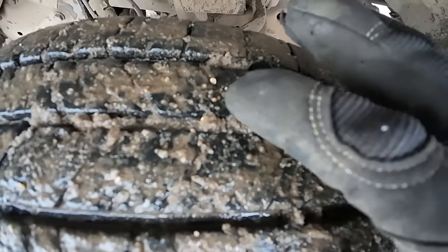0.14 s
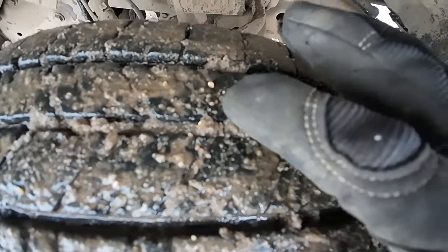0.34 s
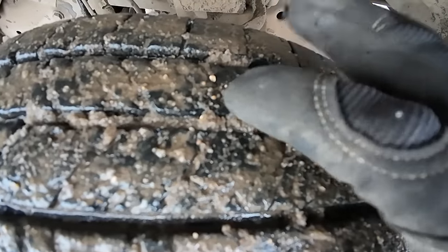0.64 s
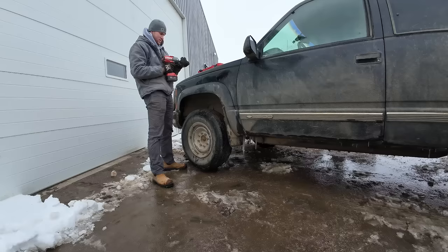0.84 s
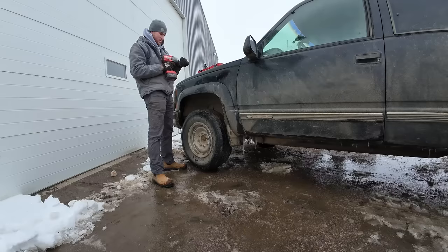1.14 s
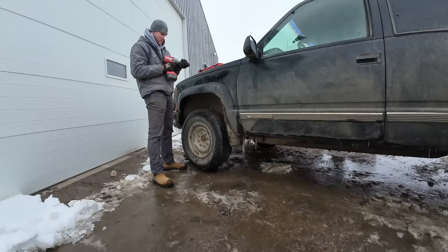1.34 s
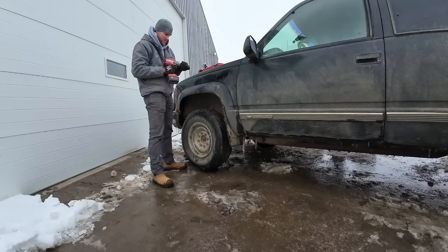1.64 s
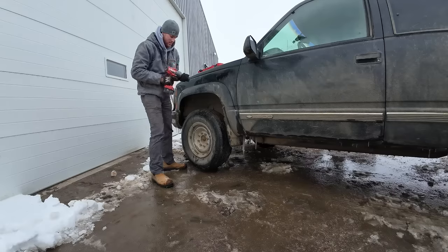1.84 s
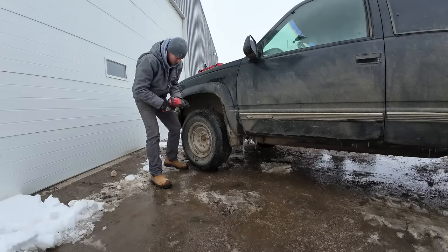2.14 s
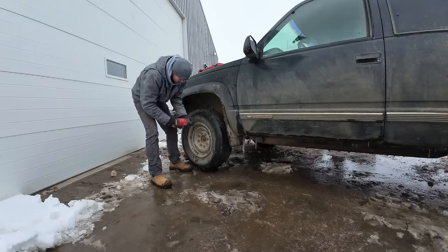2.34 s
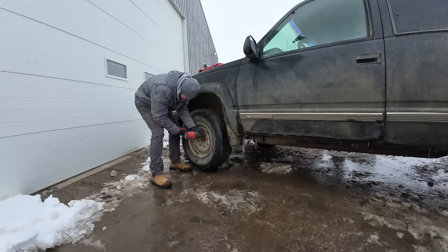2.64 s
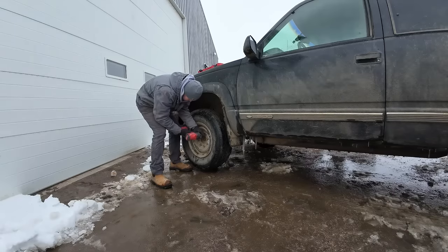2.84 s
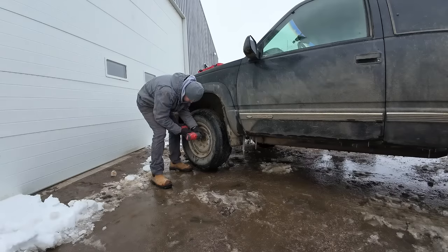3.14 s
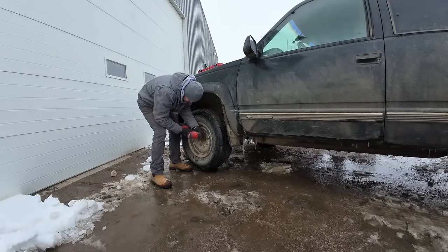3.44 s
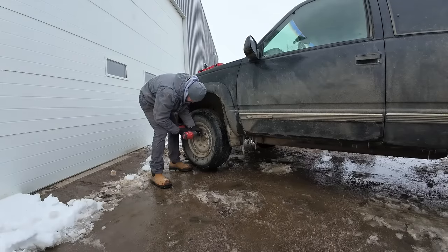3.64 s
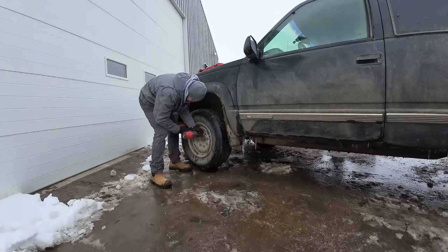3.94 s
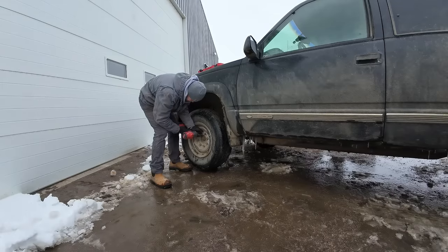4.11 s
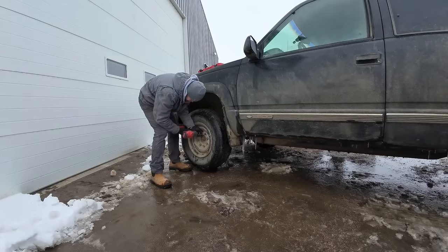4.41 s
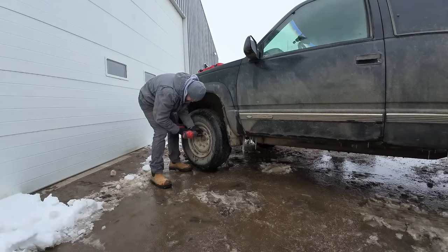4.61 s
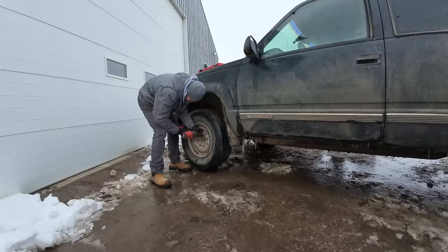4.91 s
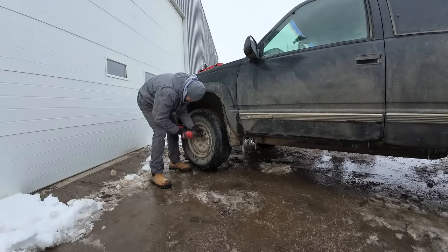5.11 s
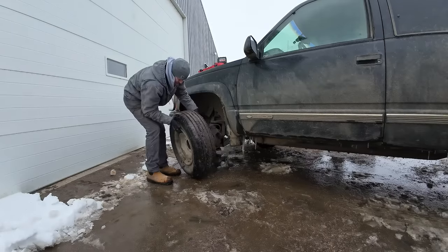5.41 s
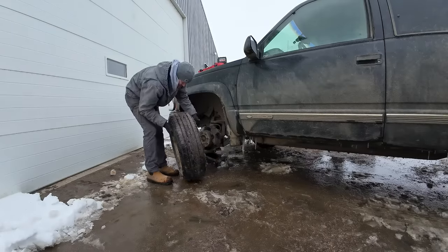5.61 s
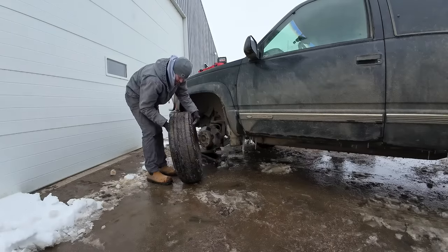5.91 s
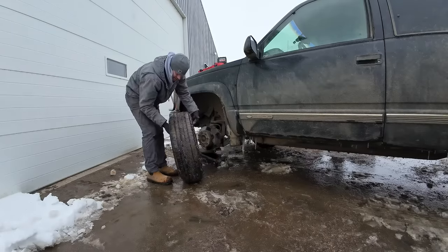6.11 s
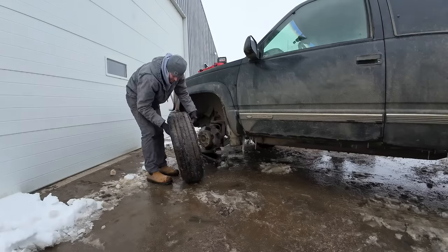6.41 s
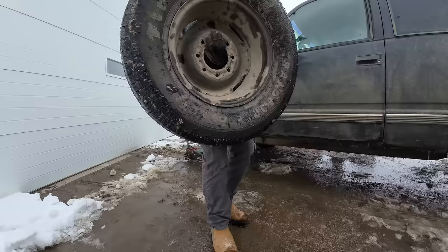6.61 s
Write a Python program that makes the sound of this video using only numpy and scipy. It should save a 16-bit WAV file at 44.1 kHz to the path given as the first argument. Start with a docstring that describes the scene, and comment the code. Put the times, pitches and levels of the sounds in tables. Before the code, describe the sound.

A bright, close jet of escaping air grows louder in short bursts, then ends abruptly. From a more distant microphone beside a shop wall come sparse clicks, clothing and dull wheel knocks. A power wrench clatters in fast metallic blows, spins up with a high whine and stops. The freed wheel scrapes, drones over wet grit and is lifted, with faint hiss and rumble throughout.

```python
"""Air hisses from a punctured truck tyre, a turbulent jet of noise that spits as a gloved finger narrows the hole.
Then, from a few steps away, boots scuff as swells of grains and hard contacts click and ring like struck modes.
An impact wrench knocks onto a wheel nut, hammers it loose with trains of blows on resonant steel and spins it
off with a whirring, whining motor. The wheel is dragged from the hub, rolls over gritty wet concrete as
grains of noise with a tread drone, and is picked up. A faint hiss and rumble lie under everything."""
import sys
import numpy as np
from scipy import signal
from scipy.fft import rfft, irfft, next_fast_len
from scipy.io import wavfile
from scipy.ndimage import uniform_filter1d, map_coordinates

SR = 44100
rng = np.random.default_rng(int(sys.argv[2]) if len(sys.argv) > 2 else 0)


def unload_audio(sound):
    """Save the sound as a 16-bit wav file, at the path given as the first command line argument."""
    columns = np.transpose(np.atleast_2d(sound))
    # keep every value between -1 and 1, then stretch to whole-number steps
    steps = np.round(np.clip(columns, -1, 1) * 32767)
    wavfile.write(sys.argv[1], SR, steps.astype(np.int16))


N = 298116
TIME = np.arange(N) / SR  # seconds


def amp(db):
    """Level law: decibels to amplitude gain."""
    return np.exp(np.asarray(db) * (np.log(10) / 20))


def unit(x):
    """Normalisation: scales a signal to rms 1."""
    return x / np.sqrt(np.mean(x ** 2) + 1e-20)


def along(points, hz):
    """Logarithmic interpolation: reads (Hz, value) points at the frequencies hz."""
    f, v = np.transpose(points)
    return np.interp(np.log(hz + 1), np.log(f + 1), v)


def wobble(rate):
    """Random modulation: a smooth curve through rate random knots a second."""
    steps = np.arange(0, N * rate / SR + 1, 1 / 8)
    knots = rng.standard_normal(int(steps[-1]) + 4)
    return np.interp(TIME * rate, steps, map_coordinates(knots, [steps]))


def filtered(x, response):
    """Linear filtering: multiplies the spectrum of x by a response of frequency."""
    m = next_fast_len(N + SR // 2)
    return irfft(rfft(x, m) * response(np.fft.rfftfreq(m, 1 / SR)), m)[..., :N]


def coloured(x, spectrum, humps=()):
    """Spectral shaping: a broad spectrum with Gaussian humps and dips, at rms 1."""
    def response(f):
        narrow_db = sum(db * np.exp(-((f - centre) / width) ** 2) for centre, width, db in humps)
        return amp(along(spectrum, f) + narrow_db)
    return unit(filtered(x, response))


def resonate(x, modes):
    """Forced resonance: x drives damped modes of alternating sign, at rms 1."""
    def response(f):
        total = 0
        for k, (centre, width, db) in enumerate(modes):
            damping = 1j * f * width
            total = total + (-1) ** k * amp(db) * damping / (centre ** 2 - f ** 2 + damping)
        return total
    return unit(filtered(x, response))


def noise():
    """White noise: equal power at every frequency."""
    return rng.standard_normal(N)


def grit(rate, depth_db):
    """Granular noise: random gain clumps it into grains, about rate a second."""
    return noise() * amp(depth_db * np.tanh(wobble(rate) / 2) * 1.68)


def patchy(x, depth_db):
    """Turbulent modulation: patches of the time-frequency plane swell and fade."""
    z = signal.stft(x, nperseg=1024)[2]
    field = uniform_filter1d(uniform_filter1d(rng.standard_normal(z.shape), 4, 0), 9, 1)
    return signal.istft(z * amp(depth_db * unit(field)), nperseg=1024)[1][:N]


def add(track, s, sound):
    """Superposition: mixes a short sound into the track at time s."""
    part = track[max(round(s * SR), 0):][:len(sound)]
    part += sound[:len(part)]


def decay(s, t60, attack=0.00019):
    """Exponential decay: the envelope of a blow at time s, losing 60 dB in t60 seconds."""
    t, env = np.arange(int(2 * t60 * SR)) / SR, np.zeros(N)
    add(env, s, amp(-60 * t / t60) * (1 - np.exp(-t / attack)))
    return env


def held(on, off, rise_s, fall_s):
    """Exponential gating: climbs 60 dB in rise_s before on, sinks 60 dB in fall_s after off."""
    return amp(-60 * (np.maximum(on - TIME, 0) / rise_s + np.maximum(TIME - off, 0) / fall_s))


def swell(s, half, db):
    """Stroke envelope: a rounded hyperbolic-secant rise and fall around time s."""
    return amp(db) / np.cosh(np.minimum(np.abs(TIME - s) * 1.66 / half, 20))


def ring(modes, scatter_db=2, sag=0):
    """Modal synthesis: damped modes, randomly scattered in strength; pitch decays at the rate sag per second."""
    t = np.arange(SR // 2) / SR
    cycles_per_hz = np.cumsum(np.exp(-sag * t)) / SR
    total = np.zeros(len(t))
    for k, (hz, db, t60) in enumerate(modes):
        envelope = amp(db + scatter_db * rng.normal() - 60 * t / t60)
        total += (-1) ** k * envelope * np.sin(2 * np.pi * hz * cycles_per_hz)
    return total


def stereo(x, side):
    """Partial decorrelation: a randomly modulated copy is added on the left and subtracted on the right."""
    s = filtered(x * unit(wobble(400)), lambda f: amp(along(side, f)))
    return np.array([x + s, x - s])


def ports(pair, lead):
    """Interchannel phase: the two microphone ports hear each frequency slightly out of step."""
    return filtered(pair, lambda f: np.exp(1j * np.outer([.5, -.5], along(lead, f))))


def background():
    """Stationary noise: a thin steady hiss over a light, uneven outdoor rumble."""
    # Spectra of hiss and rumble. Each row: frequency in Hz, relative level in dB.
    hiss_colour = [(120, -54.5), (200, -10.5), (249, -12), (577, -22), (3160, -24.5), (4010, -16.5),
                   (4560, -18.5), (5090, -16), (5780, -11.5), (6450, -8), (6940, -13), (7740, -10),
                   (9300, 1.5), (12500, -6.5), (15800, -26.5)]
    rumble_colour = [(12, -28), (20, 2.5), (44, -1.5), (124, -16), (145, -22), (193, -18), (300, -54),
                     (390, -71), (660, -120)]
    # Spread of the hiss and rumble. Each row: frequency in Hz, side minus mid in dB.
    air_side = [(60, -7), (240, -16.5), (950, -4.5), (3770, -13), (15000, 0)]
    humps = [(5170, 73, 7), (7600, 260, 3.0), (7900, 250, 8.0), (12280, 510, -32)]  # (Hz, width Hz, dB)
    hiss = amp(-49.5) * coloured(patchy(noise(), depth_db=1.5), hiss_colour, humps)
    rumble = amp(-56 + 0.83 * wobble(7.6)) * coloured(noise(), rumble_colour)
    return stereo(hiss + rumble, air_side)


def wall(x):
    """Reverberation: shop wall and truck side answer as decaying noise, longest in the bass."""
    # Decay of the reflections. Each row: frequency in Hz, time to fall 60 dB in seconds.
    wall_t60 = [(150, 0.37), (1000, 0.14), (4000, 0.11), (12000, 0.011)]
    hz, t, z = signal.stft(rng.standard_normal(SR // 2), SR, nperseg=256)
    fade = amp(-60 * t / along(wall_t60, hz)[:, None])
    tail = signal.istft(z * fade, SR, nperseg=256)[1]
    delayed = np.pad(x, (SR // 150, 0))
    return signal.fftconvolve(delayed, tail / np.linalg.norm(tail))[:N]


def rustle(rise_s=0.25, fall_s=0.74):
    """Crinkle noise: folds of the jacket snap in grains as its wearer bends and reaches."""
    # Bending and reaching. Each row: start in seconds, end in seconds, relative level in dB.
    reaches = [(1.858, 1.925, -61.5), (2.1, 2.212, -50.5), (2.25, 2.597, -56.5), (5.37, 5.456, -53.5)]
    # Spectrum of the cloth. Each row: frequency in Hz, relative level in dB.
    cloth_colour = [(150, -36), (250, -5), (431, -4), (499, -14), (1230, 2.5), (1740, -10), (1860, -2),
                    (6000, -11.5), (7800, -31), (13200, -120)]
    level = np.max([amp(db) * held(on, off, rise_s, fall_s) for on, off, db in reaches], axis=0)
    return level * coloured(grit(rate=290, depth_db=4), cloth_colour) * amp(1.1 * wobble(24.62))


def bumps(click_s=0.00016):
    """Impulse response: low booming modes, each group with a short click pulse; weight shifts thump softly."""
    # Low booming thumps with a click, one at the very start, one as the glove bumps the tyre.
    # Each row: time in seconds, thump level in dB, click peak in dB.
    bump_rows = [(.001, -27, -14), (0.5991, -19, -5)]
    # Modes of the boom. Each row: frequency in Hz, relative level in dB, 60 dB decay in seconds.
    boom_modes = [(66.8, -10, 0.33), (112, 5, 0.03), (190, -13, 0.012)]
    # Weight shifts felt through the ground. Each row: time in seconds, relative level in dB.
    weight_shifts = [(1.933, -46), (1.968, -42), (5.326, -50), (5.51, -32), (6.47, -47.5)]
    out = np.zeros(N)
    u = np.arange(SR // 50) / SR / click_s
    pulse = np.e * u * np.exp(-u)  # peaks at 1 after click_s
    for s, thump_db, click_db in bump_rows:
        add(out, s, amp(thump_db) * ring(boom_modes, scatter_db=1))
        add(out, s, -amp(click_db) * pulse)
    for s, db in weight_shifts:
        add(out, s, amp(db) * ring([(47.7, -8.0, 0.12), (88, 3, 0.13)]))
    return out


def scuffs():
    """Sliding friction: boots and rubber drag over grit, a swell of grains with a dull push."""
    # Strokes. Each row: peak time in seconds, half length in seconds, rasp level in dB,
    # push level relative to the rasp in dB.
    strokes = [(1.505, 0.016, -43.5, -8), (2.03, 0.024, -41.5, 1.5), (2.171, .015, -46.5, -12),
               (2.348, 0.019, -29, -4), (2.393, 0.0082, -45.5, 14.5), (2.493, 0.006, -41, 9),
               (2.521, 0.018, -34, 1), (3.491, 0.033, -47.5, -19), (5.524, 0.0098, -30.5, 3.5),
               (5.547, 0.015, -17.5, -13), (5.589, 0.031, -35.5, -17), (5.674, 0.017, -38.5, -19),
               (5.801, 0.021, -39, -22), (5.884, 0.031, -33.5, -13.5), (6.389, 0.029, -41.5, -19),
               (6.66, 0.0065, -32.5, -5.5), (6.743, 0.041, -40.5, -13)]
    # Spectra of rasp and push. Each row: frequency in Hz, relative level in dB.
    rasp_colour = [(290, -19.5), (500, -17), (568, -20), (976, 5), (1060, -1), (1800, -0.5), (2640, -5),
                   (3510, -3.5), (7160, -13), (9250, -4.5), (15000, -30.5)]
    push_colour = [(41, -39.5), (70, -37.5), (182, 6.5), (252, -3.5), (393, 0.5), (509, -8), (555, -19),
                   (700, -3.5), (910, -22), (1540, -120)]
    rasp, push = np.zeros((2, N))
    for s, half, db, low_db in strokes:
        stroke = swell(s, half, db)
        rasp += stroke
        push += stroke * amp(low_db)
    grains = coloured(grit(rate=450, depth_db=4.5), rasp_colour)
    return rasp * grains + push * coloured(noise(), push_colour)


def ticks(level_db=2, t60=0.021):
    """Brief impulsive noise: grit cracks and the loose nut ticks."""
    # Cracks and ticks. Each row: time in seconds, relative level in dB.
    tick_times = [(4.8358, -21.5), (4.85, -30), (5.1873, -27), (5.5852, -24), (5.6622, -28), (5.8525, -29),
                  (6.266, -36), (6.2746, -34), (6.3511, -28), (6.3729, -28), (6.4198, -34)]
    # Spectrum of a tick. Each row: frequency in Hz, relative level in dB.
    tick_colour = [(350, -36), (600, -53), (1130, -2.5), (2270, -2.5), (2960, -11), (3600, 0.5),
                   (8600, -14.5), (10600, -3), (14000, -40.5)]
    level = sum(amp(db + level_db) * decay(s, t60) for s, db in tick_times)
    return level * coloured(noise(), tick_colour)


def rolling(land_s=0.14, drone_t60=3.9):
    """Rolling contact: grit noise grows with speed, the rim resonates, tread blocks drone at their passing rate."""
    # The wheel is pulled clear, rolls and rests. Each row: time in seconds, share of full speed.
    wheel_speed = [(5.52, 0), (5.65, 0.6), (5.95, 0.83), (6.63, 0)]
    # Passing of the tread. Each row: time in seconds, block rate in Hz.
    tread_rate = [(5.85, 103.5), (5.95, 81), (6.1, 69), (6.3, 61), (6.5, 65.2)]
    # Spectrum of the grit. Each row: frequency in Hz, relative level in dB.
    grit_colour = [(120, -56), (200, -15.5), (385, -23), (433, -5), (567, -38), (629, -5), (774, -16),
                   (859, 2), (997, 5.5), (1280, -5), (1490, -1), (1840, -2), (7000, -8), (9100, -43),
                   (15400, -120)]
    # Resonances of the rim. Each row: frequency in Hz, width in Hz, relative level in dB.
    rim_modes = [(832, 37, -1), (1187, 45, -2.5), (1478, 17, 5), (2140, 34, -8.5)]
    down_s = 5.89  # the tread takes the wheel's weight
    speed = np.interp(TIME, *np.transpose(wheel_speed), left=0, right=0)
    scrape = amp(-43) * coloured(grit(rate=110, depth_db=3.5), grit_colour)
    rim = amp(-45) * resonate(noise(), rim_modes)
    rate = np.interp(TIME, *np.transpose(tread_rate)) + 6 * wobble(23)
    blocks = np.sin(2 * np.pi * np.cumsum(rate) / SR)
    drone = amp(-46) * held(down_s, down_s, land_s, drone_t60) * unit(blocks * amp(1.7 * wobble(20)))
    return speed * ((scrape + rim) * amp(1.6 * wobble(37)) + drone)


def leak(jet_db=-21.5, sputter_db=1, end_s=0.7695, stop_s=0.052):
    """Turbulent jet noise: a finger narrows the wet hole, so the jet grows louder, sharper and sputters."""
    # The finger presses on the hole. Each row: start in seconds, end in seconds, jet gain in dB.
    finger_presses = [(0.464, 0.511, 8), (0.526, 0.594, 8), (0.713, 0.783, 8.5)]
    # Spectra of the free and the narrowed jet. Each row: frequency in Hz, relative level in dB.
    open_colour = [(88, -69), (150, -42.5), (756, -28), (1230, -20.5), (2340, -20), (2900, -12.5),
                   (5740, -5), (7110, -11), (7830, -9.5), (8810, -3.5), (9900, 1.5), (11600, -4),
                   (12500, -20), (13500, -16.5), (15800, -18)]
    pinched_colour = [(88, -45), (150, -20), (1550, -24), (1930, -25.5), (2790, -24), (5000, -20),
                      (5740, -14), (7110, -12.5), (7830, -12), (8810, -6.5), (10100, 1.5), (10700, 0),
                      (12300, -20), (13500, -16), (15800, -30.5)]
    # Colour of the tread groove. Each row: frequency in Hz, width in Hz, gain in dB.
    groove = [(7100, 440, -6), (7970, 380, 8), (8800, 220, -4.5), (10500, 1600, 2.5), (12400, 210, -4.5)]
    # Spread of the jet. Each row: frequency in Hz, side minus mid in dB.
    jet_side = [(100, 0.5), (600, -1.5), (1500, -32), (3000, -50), (5000, -18.5), (8000, -7.5),
                (14000, -7.5)]
    # Balance of the jet. Each row: frequency in Hz, left minus right in dB.
    jet_balance = [(4000, -0.5), (8000, -2), (10000, 4), (13000, -2.5)]
    press_s, lift_s = .03, 0.0042  # the finger closes slowly and slips off quickly
    presses = [np.interp(TIME, [on - press_s, on, off, off + lift_s], [0, 1, 1, 0])
               for on, off, _ in finger_presses]
    pinch = np.max(presses, axis=0)
    boost_db = np.max([press * row[2] for press, row in zip(presses, finger_presses)], axis=0)
    level = held(0, end_s, stop_s, stop_s) * amp(jet_db + boost_db + sputter_db * pinch * wobble(90))
    free = coloured(grit(rate=300, depth_db=1.0), open_colour, groove)
    spit = coloured(patchy(grit(rate=600, depth_db=1.5), depth_db=2.3), pinched_colour, groove)
    jet = level * (np.sqrt(1 - pinch) * free + np.sqrt(pinch) * spit)  # equal-power crossfade
    return filtered(stereo(jet, jet_side), lambda f: amp(np.outer([.5, -.5], along(jet_balance, f))))


def knocks(clack_db=-10, thud_db=-9, body_db=-13, rim_db=-16, edge_db=-7):
    """Impact excitation: a clack, bright edge and ping, with a thud, a rim ring and wheel modes that sink in pitch."""
    # Tool and wheel contacts. Each row: time in seconds, relative level in dB, low body in dB,
    # bright edge in dB, ping frequency in Hz, ping level in dB (the last three levels are over the second column).
    contact_rows = [(0.835, -37.5, -36, -8.5, 900, -6.5), (1.418, -51, -25, -15, 1140, -3),
                    (1.479, -39.5, -26, 2, 2300, -8), (1.521, -20, -51, -18, 1316, 0),
                    (2.387, -24.5, -24, -14, 1040, -10), (2.664, -44, -25, -19.5, 1850, 0),
                    (2.795, -11.5, -1.5, -8, 1180, -11.5), (2.906, -42, -22, 4, 2070, -2),
                    (3.283, -41.5, -27, 8, 2430, -2), (3.322, -50.5, -21, 0, 1940, 2),
                    (3.463, -22.5, -3, -9, 1187, -7.5), (3.572, -32.5, -7, -2, 2080, -6.5),
                    (3.811, -18.5, -37, 2, 3150, -8), (3.844, -13.5, -11, -7, 1080, -12),
                    (5.509, -32, -6, -4.5, 980, -3), (5.639, -27.5, -33, 9.5, 1075, 2.5),
                    (5.954, -28.5, -13.5, 0.5, 1130, 0), (6.645, -22, -10, -10, 1430, -11)]
    # Spectra of clack and thud. Each row: frequency in Hz, relative level in dB.
    clack_colour = [(240, -20), (400, -8), (661, -16), (1250, 4), (1600, -5), (2090, 1.5), (3580, -4),
                    (3940, -7), (5580, -13.5), (6440, -10.5), (7000, -21.5), (9100, -38.5), (15400, -120)]
    thud_colour = [(47, -49.5), (80, -7), (113, -11.5), (194, 4.5), (288, 4.5), (381, -1.5), (519, -2),
                   (617, -22.5), (800, -12.5), (1040, -47), (1760, -120)]
    # Modes of wheel and rim. Each row: frequency in Hz, relative level in dB, 60 dB decay in seconds.
    wheel_modes = [(195, 4.5, 0.2), (275, 3.5, 0.15), (365, 0, .11), (480, -7, 0.08)]
    rim_modes = [(1222, -2.5, .19), (1700, -4.5, .12), (1995, -11, .1), (2360, -11, .075)]
    clack_t60, ping_t60, thud_t60, edge_t60 = 0.093, 0.038, 0.13, 0.022  # seconds
    clack, edge, thud, rings = np.zeros((4, N))
    for s, db, low_db, bright_db, hz, ping_db in contact_rows:
        clack += amp(db + clack_db) * decay(s, clack_t60)
        edge += amp(db + bright_db + edge_db) * decay(s, edge_t60)
        thud += amp(db + low_db + thud_db) * decay(s, thud_t60, attack=0.0029)
        wheel = amp(body_db) * ring(wheel_modes, sag=4.5) + amp(rim_db) * ring(rim_modes)
        ping = ring([(hz, db + ping_db, ping_t60)], scatter_db=0)
        add(rings, s, amp(db + low_db) * wheel + ping)
    edge *= coloured(noise(), [(3000, -22.5), (5500, 1.5), (10000, -1.5), (15000, -21)])
    return rings + edge + clack * coloured(noise(), clack_colour) + thud * coloured(noise(), thud_colour)


def motor(gear_db=-33, gear_db_per_octave=8, settled_hz=400, racing_hz=520, start_s=0.27, stop_s=0.024):
    """Gear orders and modulation sidebands: teeth whirr with speed, turning flanks the drive's switching tone."""
    # Trigger pulls. Each row: up to strength in seconds, released in seconds, drive whine in dB.
    trigger_pulls = [(3.84, 4.384, -4), (4.538, 5.313, 1)]
    # The freed motor. Each row: time in seconds, electrical turning rate in Hz.
    free_speed = [(4.5, 17.7), (4.55, 270), (4.59, 500), (4.7, 605), (4.8, 490), (4.92, 400), (5.05, 411),
                  (5.32, 390)]
    # Spectrum of the gears. Each row: frequency in Hz, relative level in dB.
    gear_colour = [(71, -44), (120, -11.5), (188, -4.5), (602, -15), (1180, -5), (1480, -9.5), (1970, 0),
                   (2570, -5), (2900, -1.5), (3280, -5.5), (6700, -14), (8050, -14), (10900, -11),
                   (12600, -36.5), (15800, -25)]
    # Colour of the gearbox. Each row: frequency in Hz, width in Hz, gain in dB.
    gearbox = [(622, 86, -10.5), (903, 78, 8.5), (1170, 50, 5.5), (1520, 150, -4.5), (2100, 290, 0.5),
               (2870, 80, 8), (4000, 430, 4)]
    # Tooth harmonics. Each row: multiple of the turning rate, relative level in dB.
    gear_orders = [(2, -10), (3, -7), (4, -4), (5, 0), (6, -7), (7, -6), (8, -13)]
    # Lines around the switching tone. Each row: multiple of the turning rate,
    # relative level when settled in dB, relative level when racing in dB.
    sidebands = [(-2, -74, -65), (-1, -57, -47), (0, -41, -45), (1, -40, -42.5), (2, -64, -50)]
    loaded_hz, nut_free_s = 141.3, 4.45  # turning rate while hammering, and when that ends
    switch_hz = 7870
    pulls = [held(on, off, start_s, stop_s) for on, off, _ in trigger_pulls]
    drive = sum(pull * amp(row[2]) for pull, row in zip(pulls, trigger_pulls))
    rate = np.where(TIME < nut_free_s, loaded_hz, np.interp(TIME, *np.transpose(free_speed)))
    level = sum(pulls) * amp(gear_db + gear_db_per_octave * np.log2(rate / settled_hz))
    race = np.clip((rate - settled_hz) / (racing_hz - settled_hz), 0, 1)
    # the rattling socket loads the motor unevenly
    turn = 2 * np.pi * np.cumsum(rate + 12 * wobble(150)) / SR
    whirr = coloured(patchy(noise(), depth_db=3.5) * (1 + .5 * np.cos(turn)), gear_colour, gearbox)
    teeth = sum(amp(db + 3 * wobble(35)) * np.sin(k * turn + 1.2 * wobble(12)) for k, db in gear_orders)
    mesh = coloured(teeth, gear_colour, gearbox)
    whine = np.zeros(N)
    for k, db, race_db in sidebands:
        line_level = amp(db + race * (race_db - db) + 0.92 * wobble(27))
        whine += line_level * np.sin(2 * np.pi * switch_hz * TIME + round(k) * turn)
    gears = whirr + amp(-10 + 5 * race) * mesh  # the teeth sing out when racing
    return level * gears + np.sqrt(2) * drive * whine


def hammering(rise_s=0.12, fall_s=0.17, lead_s=0.0072, rebound_s=.017):
    """Impact train: (s, dB) of every blow and its one rebound, and the rattle kept up through each run."""
    # Runs as the nut catches, resists and gives. Each row: start in seconds, number of blows,
    # first gap in seconds, ratio of each gap to the last, first blow in dB, change per blow in dB,
    # rebound relative to its blow in dB, rattle in dB.
    blow_runs = [(3.877, 3, .0586, .655, .5, -1, -2.5, -26), (4.0246, 9, .028, 1.02, -1.5, 0, -30, -30),
                 (4.312, 3, .0456, 1.12, -4.5, -2, 1, -27)]
    strikes, rattle = [], np.zeros(N)
    for start, count, gap, growth, db, step_db, rebound_db, rattle_db in blow_runs:
        k = np.arange(round(count))
        times = start + np.append(0, np.cumsum(gap * growth ** k[:-1]))
        levels = db + step_db * k
        strikes += [*zip(times, levels), *zip(times + rebound_s, levels + rebound_db)]
        fade = amp(rattle_db + np.interp(TIME, times, step_db * k))
        rattle = np.maximum(rattle, fade * held(start - lead_s, times[-1] - lead_s, rise_s, fall_s))
    return strikes, rattle


def hammer(crack_db=-11, tail_db=-21, snap_db=-13, rattle_db=-2, steel_db=-5, hub_db=-10, shudder_db=-10):
    """Repeated impact: blows, some 33 a second in the long run, set socket and rim ringing and rattling."""
    # Spectrum of the clatter. Each row: frequency in Hz, relative level in dB.
    clatter_colour = [(53, -18.5), (90, 1), (139, -12), (192, 10.5), (249, 1.5), (344, 4), (409, -4),
                      (603, -22), (930, 6), (1600, -1.5), (2110, 7.5), (4610, 5.5), (6800, -5.5),
                      (10300, 3), (15800, -41.5)]
    # Resonances of socket, nut and rim, then the low ones of hub and rim.
    # Each row: frequency in Hz, width in Hz, relative level in dB.
    steel_modes = [(191.6, 6, -3), (1180, 180, 5), (2093, 40, 7.5), (2680, 68, 2), (3700, 39, -8),
                   (4030, 41, -6.5), (4500, 420, 2), (5186, 42, 7.5), (6150, 250, 1.5), (7100, 88, -24),
                   (7800, 100, -9), (9800, 380, -14.5), (9900, 56, -12.5)]
    hub_modes = [(179, 30, 4.5), (334.5, 29, 2), (474, 52, -6), (920, 150, -1)]
    # The tyre shakes most while the nut resists: peak in seconds, half length in seconds, level in dB.
    tyre_shake = (4.08, 0.027, -28.5)
    # The socket rubs and squeals. Each row: peak in seconds, half length in seconds, level in dB.
    squeal_rows = [(3.838, .015, -33), (4.356, 0.012, -21), (4.387, 0.0079, -16.5), (4.495, 0.0025, -27.5),
                   (4.532, 0.017, -37.5), (4.571, 0.024, -30), (4.695, 0.029, -25.5), (4.724, .012, -26),
                   (5.238, 0.037, -32)]
    crack_t60, tail_t60, snap_t60 = 0.014, 0.13, 0.041  # seconds
    strikes, rattle = hammering()
    shudder = amp(shudder_db) * rattle + swell(*tyre_shake)
    squeal = sum(swell(*row) for row in squeal_rows)
    rattle = rattle * amp(3 * wobble(250))  # small uneven rebounds

    def blows(t60):
        """Superposed decays: the envelope of all strikes."""
        return sum(amp(db) * decay(s, t60) for s, db in strikes)

    impact = amp(crack_db) * blows(crack_t60) + amp(tail_db) * blows(tail_t60)
    force = np.hypot(impact, amp(rattle_db) * rattle)
    clatter = force * coloured(patchy(noise(), depth_db=1.5), clatter_colour)
    bright = coloured(noise(), [(1000, -28.5), (3500, -5.0), (8000, 2.0), (11000, -0.5), (15000, -20)])
    snap = amp(snap_db) * blows(snap_t60) * bright
    steel = resonate(force * noise(), steel_modes) * np.std(clatter) * amp(steel_db)
    hub = resonate(force * noise(), hub_modes) * np.std(clatter) * amp(hub_db)
    boom = shudder * coloured(noise(), [(20, -26.0), (45, 4.0), (130, -3), (260, -21.5)])
    socket = squeal * coloured(noise(), [(2000, -59), (2750, -14), (2930, 11), (3100, -30.5), (4000, -61)])
    return snap + clatter + steel + hub + boom + socket


def scene(contact_wet_db=-16, tool_wet_db=-19, left_db=0.2):
    """Superposition: the close leak, then the work at the wheel, a little to the left."""
    # Spread of the work. Each row: frequency in Hz, side minus mid in dB.
    work_side = [(60, -30.5), (300, -30), (1200, -32), (2500, -31), (4400, -5.5), (8000, -5.5),
                 (15000, -4.5)]
    # Phase of leak and work. Each row: frequency in Hz, lead of the left port in radians.
    leak_lead = [(0, 0), (5340, -0.0), (5770, 0.84), (7490, -0.4), (9730, -0.51), (11400, -1.5),
                 (12400, 0.0), (13300, -0.8), (14000, 0.0), (16400, -0.2)]
    work_lead = [(0, 0), (3190, -0.0), (5770, -0.2), (7060, 0.69), (7580, -0.084), (9990, 1.34),
                 (12000, -0.58), (14900, 0.4), (15200, 0.0), (16400, 0.7)]
    contacts = knocks() + ticks() + scuffs()
    tool = hammer() + motor()
    echo = wall(amp(contact_wet_db) * contacts + amp(tool_wet_db) * tool)
    yard = contacts + tool + rolling() + rustle() + echo
    work = ports(stereo(yard + bumps(), work_side), work_lead)
    return ports(leak(), leak_lead) + (work + background()) * amp([[left_db], [-left_db]])


def record(dry):
    """Clipping and band limiting: cuts peaks at full scale and keeps nothing above the band limit."""
    top_hz = 15800
    return filtered(np.clip(dry, -1, 1), lambda hz: hz < top_hz)


dry = scene()
out = record(dry)
unload_audio(out)
```